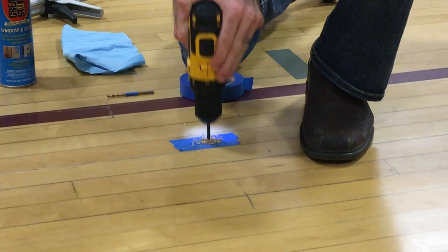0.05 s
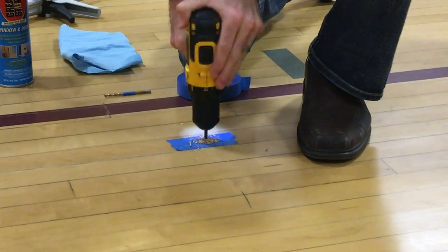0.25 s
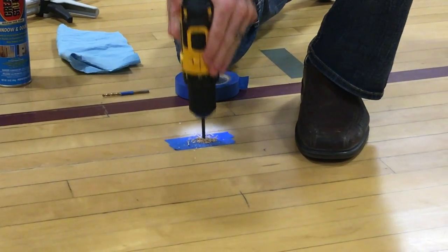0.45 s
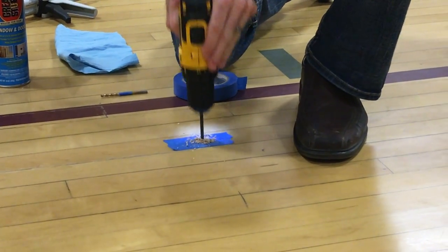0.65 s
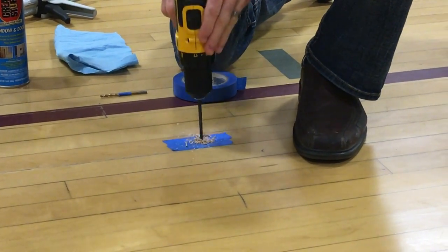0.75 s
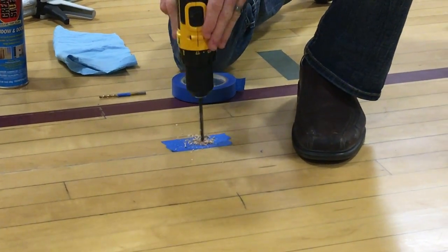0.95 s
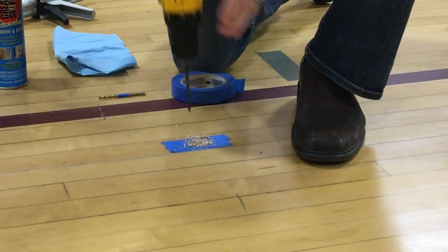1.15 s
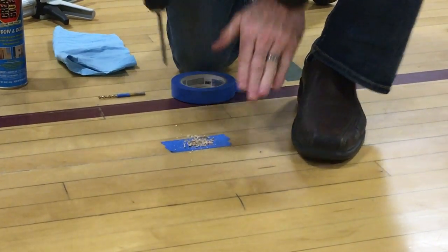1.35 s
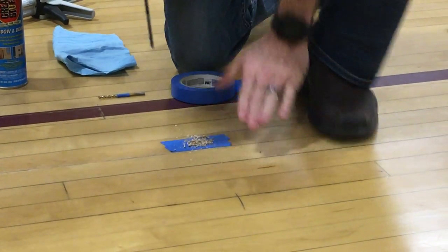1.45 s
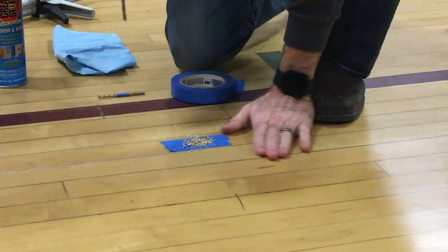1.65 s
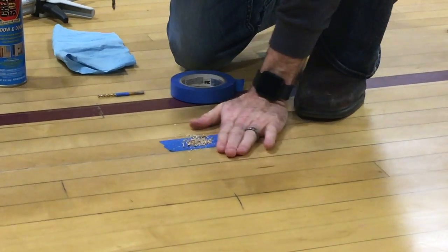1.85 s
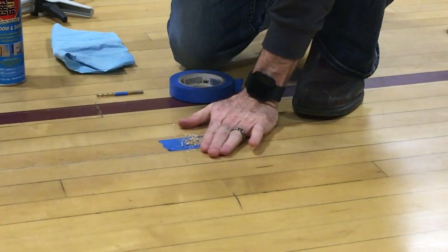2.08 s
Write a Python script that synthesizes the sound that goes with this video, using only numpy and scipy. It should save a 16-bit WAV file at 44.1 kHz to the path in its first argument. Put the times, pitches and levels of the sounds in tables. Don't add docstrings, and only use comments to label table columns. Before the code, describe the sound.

A cordless drill bores into a wooden sports hall floor, its steady, slightly wavering gear whine mixed with brush hiss and buzzing rattles. At about 0.85 s it cuts off, with two brake clacks near 0.9 and a switch click at 1.0. Faint reverberation and low ventilation rumble remain. From 1.4 to 1.75 s the drill clatters lightly, a hand brushes the floor, and a ring scrapes wood chips around 1.9.

```python
import sys
import numpy as np
from scipy import signal
from scipy.fft import rfft, irfft, next_fast_len
from scipy.io import wavfile
from scipy.ndimage import uniform_filter1d, map_coordinates

SR = 44100
rng = np.random.default_rng(int(sys.argv[2]) if len(sys.argv) > 2 else 0)


def generate_wav(sig):
    pcm = np.round(np.clip(np.atleast_2d(sig).T, -1, 1) * 32767).astype(np.int16)
    wavfile.write(sys.argv[1], SR, pcm)


def boost(x):
    u = np.asarray(x, float) / 20
    return 10 ** u


N = 93492
T = np.arange(N) / SR

# time_s, speed_hz
SHAFT_SPEED = [(0, 414.5), (.07, 414.5), (.15, 410), (.35, 416.5), (.42, 411), (.62, 417.5), (.68, 411.8),
               (.82, 418.3), (.9, 402)]
# time_s, level_db
EFFORT = [
    (0, -0.8),
    (.62, -0.44),
    (.83, -1.5),
    (.88, -2.5),
    (.902, -9),
    (.925, -12.5),
    (0.949, -30),
    (.99, -56),
]
SHAFT_ORDERS = [9, 10, 18, 4.5, 5, 27, 8.25, 14.7, 2.32]
# level_db, swell_db, phase_turns
TONES = [(-8.5, 1, 0.092), (-12, 0.5, 0.11), (-27.5, 0.5, 0.36), (-19.5, -2, 0.61), (-19.5, 2.5, 0.42),
         (-31, 11, 0.46), (-18.5, 2, 0.11), (-27, 7, 0.32), (-25, -1, 0.88)]
# time_s, half_length_s, swell_db
SLIPS = [
    (.015, .015, -3),
    (.33, 0.01, -4),
    (.425, .012, 0),
    (.645, 0.02, -15),
    (.745, .012, -7),
    (.785, 0.013, -12),
]
# time_s, half_length_s, swell_db
SINGS = [
    (.11, 0.068, 15),
    (.39, .05, 16),
    (.47, .03, 9),
    (.68, .07, 18),
    (.825, .02, 14),
]
# time_s, half_length_s, swell_db
RATTLE = [
    (.085, 0.024, 8.5),
    (.152, 0.019, 12.5),
    (.205, 0.02, 9),
    (.34, 0.018, 8.5),
    (.395, 0.024, 9),
    (.455, 0.021, 9.5),
    (.55, 0.017, 3),
    (.612, 0.018, 10),
    (.70, 0.027, 7.5),
    (.84, .015, -4),
]
# freq_hz, level_db
WHIRR = [(250, -22.5), (600, -18.5), (1200, -10.5), (2700, -13.5), (5000, -12), (8000, -8), (10500, -14.5),
         (15700, -20)]
# freq_hz, width_hz, level_db
HOUSING = [(1930, 860, 4), (2630, 370, -2), (3320, 900, 5.5), (4030, 1060, 7.5), (5810, 1300, 3.5),
           (7900, 700, -1.5), (11900, 600, 2.5)]
# freq_hz, width_hz, level_db, swell_db, phase_turns
BUZZES = [(185, 50, -22, 5, 0.755), (5650, 1100, -19.5, 9, 0.32), (1625, 180, -27, 2, 0.93),
          (3240, 340, -12, 2.5, 0.36), (7150, 360, -17, 4.5, 0.63)]
# time_s, swell_db, half_length_s
GRABS = [
    (.873, 4, .002),
    (.8885, 5, .0022),
    (.923, 5, .003),
]
# freq_hz, t60_s
HALL = [(500, 2.3), (1500, 1.46), (4000, 0.54), (12000, 0.2)]
# freq_hz, level_db
AIR = [(15, -39.5), (25, -9.5), (83, 1.5), (134, -5.5), (188, -9.5), (251, -12.5), (303, -18), (322, -17),
       (500, -43.5), (650, -71), (1100, -120)]
# freq_hz, width_hz, level_db
DUCT = [(83.9, 29.4, -6), (125.2, 23.5, -12), (249.6, 28, -18)]
# freq_hz, level_db
HISS = [(240, -12), (400, 1), (865, -11), (949, -9.5), (1200, -13.5), (1440, -9.5), (1530, -15.5),
        (2090, -21.5), (16000, -41)]
# time_s, peak_db, ring_hz, t60_s, tilt_db_per_decade
CLACKS = [(.888, -20, 3180, 0.016, -5), (.9215, -26, 3150, 0.014, -5), (1.0133, -27, 3650, 0.014, -8),
          (1.4359, -24, 3400, 0.015, -11), (1.4742, -28, 4600, 0.0089, -4), (1.4862, -32, 3400, 0.008, -7),
          (1.4924, -24.5, 4130, 0.013, -3), (1.4968, -28, 3100, 0.013, -2),
          (1.5325, -30.5, 4730, 0.019, -2), (1.5554, -35, 4130, 0.018, 6), (1.5689, -32, 3760, 0.027, -7),
          (1.5924, -35, 3480, 0.012, -8), (1.6024, -29, 3670, 0.016, -12.5), (1.6224, -38, 4220, 0.013, 1),
          (1.6606, -30.5, 4440, 0.014, -4)]
# time_s, peak_db, ring_hz, t60_s, tilt_db_per_decade
TICKS = [(1.0474, -54, 3270, 0.018, 5), (1.1149, -50.5, 3500, 0.022, 34), (1.1244, -52, 3280, 0.015, 1),
         (1.1544, -60, 3730, 0.015, 11), (1.4037, -55, 4150, 0.013, 10), (1.4548, -48, 3300, 0.013, 15),
         (1.4676, -48, 4260, 0.013, 4), (1.5104, -55, 4630, 0.014, 13), (1.5454, -51, 3560, 0.014, 11),
         (1.6926, -51, 4140, 0.012, 10), (1.7853, -51, 3240, 0.014, 6), (2.1044, -55, 4030, 0.01, 19),
         (1.4295, -33.5, 4250, 0.0079, 10), (1.7385, -45, 3900, .012, -7), (1.4338, -40, 4500, .008, 0),
         (1.4815, -40, 2200, 0.012, -5), (1.5075, -52, 5500, .01, 10), (2.09, -57, 9000, .01, 20)]
# freq_hz, level_db
CRACK = [(300, -39), (800, 4), (2200, -2.5), (4000, 6.5), (7000, -7), (10000, -22), (16500, -33)]
# time_s, peak_db, pitch_hz, t60_s
KNOCKS = [(0.8882, -25.5, 1987, 0.021), (.922, -26.5, 1860, 0.0063), (1.0136, -40, 1746, 0.014),
          (1.0146, -37, 717, 0.024), (1.048, -40, 428, 0.047), (1.4363, -40.5, 1060, 0.02),
          (1.533, -36, 1800, .015), (1.5553, -31, 1060, 0.016), (1.5523, -42, 910, 0.014),
          (1.739, -33, 1092, 0.023), (1.985, -51, 1470, 0.063)]
# ratio_to_pitch, level_db
WOOD = [(.62, -4), (1, 0), (1.27, -10), (1.6, -2), (2.15, -13), (2.7, -15)]
# start_s, length_s, level_db, brightness_db_per_decade
STROKES = [
    (1.475, 0.094, -58.5, -3),
    (1.538, 0.14, -52.5, 3),
    (1.648, 0.13, -77, 3),
    (1.725, 0.32, -65.5, 6),
    (1.927, 0.29, -69, -4.5),
]
# freq_hz, level_db
SKIN = [(350, -29), (600, 8.5), (768, -18), (858, -6), (2540, -10.5), (3990, -5), (16000, -22)]
# start_s, length_s, level_db
SCUFFS = [
    (1.889, 0.0063, -49.5),
    (1.8975, .008, -63),
    (1.904, 0.012, -57),
    (1.914, 0.0036, -54.5),
    (1.92, .018, -58),
]
# time_s, peak_db
CHIPS = [
    (1.8932, -35),
    (1.8945, -40),
    (1.8968, -42),
    (1.9038, -46),
    (1.905, -44),
    (1.9075, -44),
    (1.9163, -42),
    (1.9176, -40),
    (1.9265, -48),
    (1.9335, -45),
]
# freq_hz, width_hz, level_db
SCUFF_RINGS = [(5460, 1700, -2.5), (9400, 1400, 1.5), (12200, 2000, 0.5), (15100, 2500, -4),
               (3500, 1700, -9)]
# time_s, low_hz, high_hz, level_db
SIDE_NOISE = [
    (.178, 4100, 5400, -46),
    (.178, 9600, 11100, -50),
    (.178, 12400, 14600, -52),
    (.458, 4100, 5900, -45),
    (.713, 4600, 5900, -46),
    (1.2, 11700, 13800, -88),
]

RUN_DB, RELEASE_S, TONE_FADE_DB_PER_S = -30, 0.838, 300
SWELL_HZ = 3.56
FLUTTER_DB, HIGH_FLUTTER_DB, JITTER_TURNS = 0.5, 1.5, 0.006
BRUSH_ORDER, BRUSH_DEPTH, SPARKS_PER_S, SPARK_DB = 0.712, 0.2, 2500, -7
HALL_DB, NEAR_DB, NEAR_T60_S = -18, -16.5, 0.047
AIR_DB, HISS_DB = -43, -59
RISE_S, SNAP = 0.0007, 3
PUFF = 0.25
TOP_HZ, EDGE_HZ = 15800, 70
SIDE_NOISE_S = 0.03


def unit(x):
    return x / np.sqrt(np.mean(x ** 2) + 1e-20)


def along(points, hz):
    f, v = np.transpose(points)
    return np.interp(np.log(hz + 1), np.log(f + 1), v)


def wobble(rate_hz):
    return map_coordinates(rng.standard_normal(int(N * rate_hz / SR) + 4), [T * rate_hz])


def swells(rows):
    return sum(db * np.exp(-((T - s) / half_s) ** 2) for s, half_s, db in rows)


def hand_pressure(level_db, swell_db, phase_turns):
    return level_db + swell_db * np.cos(2 * np.pi * (SWELL_HZ * T - phase_turns))


def resonance(f, hz, width_hz):
    return 1j * f * width_hz / (hz * hz - f * f + 1j * f * width_hz)


def filtered(x, response):
    m = next_fast_len(len(x) + 8192)
    return irfft(rfft(x, m) * response(np.fft.rfftfreq(m, 1 / SR)), m)[:len(x)]


def noise_through(response):
    return unit(filtered(rng.standard_normal(N), response))


def resonant_noise(hz, width_hz):
    return noise_through(lambda f: resonance(f, hz, width_hz) ** 2)


def causal(points, size):
    gain = boost(along(points, np.fft.rfftfreq(size, 1 / SR)))
    cepstrum = irfft(np.log(gain + 1e-4), size)
    cepstrum[1:size // 2] *= 2
    cepstrum[size // 2 + 1:] = 0
    h = irfft(np.exp(rfft(cepstrum)), size)
    return h / np.linalg.norm(h)


def patchy(x, depth_db):
    z = signal.stft(x, nperseg=512)[2]
    field = uniform_filter1d(rng.standard_normal(z.shape), size=6, axis=0)
    field = uniform_filter1d(field, size=10, axis=1)
    return signal.istft(z * boost(depth_db * unit(field)), nperseg=512)[1][:N]


def add_hit(out, s, peak_db, hit):
    out[round(s * SR):][:len(hit)] += boost(peak_db) * hit / np.abs(hit).max()


def gear_whine(turns):
    mesh, octave, case = SHAFT_ORDERS[0], SHAFT_ORDERS[2], SHAFT_ORDERS[-1]
    extra_db = {octave: swells(SINGS), mesh: swells(SLIPS), case: swells(RATTLE)}
    tones = 0
    for order, row in zip(SHAFT_ORDERS, TONES):
        flutter_db = FLUTTER_DB if order < octave else HIGH_FLUTTER_DB
        level_db = hand_pressure(*row) + flutter_db * wobble(39.8) + extra_db.get(order, 0)
        phase = 2 * np.pi * order * (turns + JITTER_TURNS * wobble(61.2))
        tones = tones + boost(level_db) * np.sin(phase)
    return tones * boost(-TONE_FADE_DB_PER_S * np.clip(T - RELEASE_S, 0, 1))


def brush_noise(turns):
    sparks = (rng.random(N) < SPARKS_PER_S / SR) * rng.standard_normal(N)
    pulse = 1 + BRUSH_DEPTH * np.cos(2 * np.pi * BRUSH_ORDER * turns)
    raw = rng.standard_normal(N) * pulse + boost(SPARK_DB) * unit(sparks)

    def housing(f):
        bumps_db = sum(db / (1 + ((f - hz) / width * 2) ** 4) for hz, width, db in HOUSING)
        return boost(along(WHIRR, f) + bumps_db)

    return unit(filtered(patchy(raw, depth_db=1.36), housing))


def housing_buzz():
    buzz = boost(-22.5 + swells(RATTLE)) * resonant_noise(941, 100)
    for hz, width_hz, *pressure in BUZZES:
        buzz = buzz + boost(hand_pressure(*pressure)) * resonant_noise(hz, width_hz)
    return buzz


def drill():
    turns = np.cumsum(np.interp(T, *np.transpose(SHAFT_SPEED))) / SR
    s, db = np.transpose(EFFORT)
    level = boost(RUN_DB + np.interp(T, s, db, right=-90))
    grab_db = swells([(s, half_s, db) for s, db, half_s in GRABS])
    noise = brush_noise(turns) + housing_buzz()
    return level * (boost(-1.05 + grab_db) * noise + np.sqrt(2) * gear_whine(turns))


def hall(x):
    hz, t, z = signal.stft(rng.standard_normal(SR), SR, nperseg=256)
    decay = boost(-60 * t / along(HALL, hz)[:, None])
    far = signal.istft(z * decay, SR, nperseg=256)[1]
    near = rng.standard_normal(len(far)) * boost(-60 * np.arange(len(far)) / SR / NEAR_T60_S)
    tail = boost(HALL_DB) * far / np.linalg.norm(far) + boost(NEAR_DB) * near / np.linalg.norm(near)
    return signal.fftconvolve(np.pad(x, (60, 0)), tail)[:N]


def ventilation():
    rumble_points = [(10, -85), (28, -12)] + AIR[2:] + [(1200, -130)]
    hiss_points = [(100, -63)] + HISS
    rumble_db = AIR_DB + 1.68 * wobble(8.51) + 0.28 * wobble(6.3)
    rumble = boost(rumble_db) * noise_through(lambda f: boost(along(rumble_points, f)))
    ducts = sum(boost(AIR_DB + db) * resonant_noise(hz, width_hz) for hz, width_hz, db in DUCT)
    hiss = boost(HISS_DB + 1.6 * wobble(4.95)) * noise_through(lambda f: boost(along(hiss_points, f)))
    return rumble + ducts + hiss


def click(ring_hz, t60_s, tilt_db, ring_gain, relative_width):
    t = np.arange(2048) / SR
    envelope = boost(-60 * t / max(t60_s, 0.003)) * (1 - np.exp(-(t / RISE_S) ** 2))
    contact = np.arange(len(t)) == round(RISE_S * SR)
    burst = rng.standard_normal(len(t)) * envelope + SNAP * contact
    ring = filtered(burst, lambda f: resonance(f, ring_hz, relative_width * ring_hz))
    tilted = [(f, db + tilt_db * np.log10(f / 4000)) for f, db in CRACK]
    crack = np.convolve(burst, causal(tilted, size=256))[:len(t)]
    return unit(crack) + ring_gain * unit(ring)


def clicks():
    out = np.zeros(N + SR)
    for rows, ring_gain, relative_width in ((CLACKS, 1.3, 0.45), (TICKS, 1.7, 0.6)):
        for s, peak_db, *tone in rows:
            add_hit(out, s, peak_db, click(*tone, ring_gain, relative_width))
    return out[:N]


def knocks():
    out, t = np.zeros(N + SR), np.arange(4096) / SR
    for s, peak_db, hz, t60_s in KNOCKS:
        ring = sum(boost(db + rng.normal(0, 0.72)) * np.sin(2 * np.pi * ratio * hz * t) for ratio, db in WOOD)
        puff = unit(filtered(rng.standard_normal(len(t)), lambda f: resonance(f, 1.29 * hz, 1.2 * hz) ** 3))
        envelope = boost(-60 * t / t60_s) * (1 - np.exp(-t / 0.00056))
        add_hit(out, s, peak_db, (ring + PUFF * puff) * envelope)
    return out[:N]


def brushing():
    out = 0
    for s, length_s, db, bright_db in STROKES:
        u = (T - s) / length_s
        shape = np.clip(u / 0.059, 0, 1) * np.clip((1 - u) / 0.56, 0, 1)
        raw = rng.standard_normal(N) * boost(1.4 * wobble(300))
        grain = filtered(raw, lambda f: boost(along(SKIN, f) + bright_db * np.log10(f / 4000 + 1e-3)))
        out = out + boost(db) * shape * unit(grain)
    return out


def scuff():
    def colour(f):
        return sum((-1) ** k * boost(db) * resonance(f, hz, width_hz)
                   for k, (hz, width_hz, db) in enumerate(SCUFF_RINGS))

    grit = unit(filtered(rng.standard_normal(N) * boost(2.2 * wobble(1500)), colour))
    shape = 0
    for s, length_s, db in SCUFFS:
        rise = np.clip((T - s) / 0.00067, 0, 1)
        decay = boost(-60 * np.clip(T - s - length_s, 0, 1) / 0.026)
        shape = shape + boost(db) * rise * decay
    snaps, snap = np.zeros(N), filtered(np.arange(64) == 0, colour)
    for s, peak_db in CHIPS:
        add_hit(snaps, s, peak_db, snap)
    return shape * grit + snaps


def scene():
    near = drill() + clicks() + knocks() + brushing() + scuff()
    return np.tile(near + hall(near) + ventilation(), (2, 1))


def low_pass(x):
    return signal.sosfilt(signal.butter(12, 17030, fs=SR, output="sos"), x)


def record(dry):
    def band_limit(f):
        shelf = boost(-18.5 * (1 + np.tanh((f - TOP_HZ) / EDGE_HZ)))
        return shelf * (1 - np.tanh((f - TOP_HZ - 800) / EDGE_HZ)) / 2

    mid = filtered(dry[0], band_limit)
    side = 0
    for s, low_hz, high_hz, db in SIDE_NOISE:
        window = np.cos(np.pi * np.clip((T - s) / SIDE_NOISE_S, -0.5, 0.5))
        side = side + boost(db) * window * noise_through(lambda f: (f > low_hz) & (f < high_hz))
    return low_pass(np.array([mid + side, mid - side]))


dry = scene()
out = record(dry)
generate_wav(out)
```